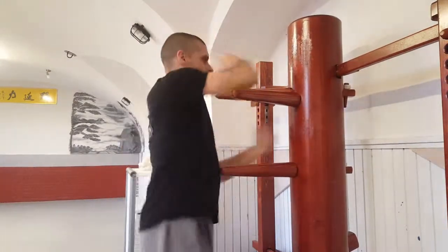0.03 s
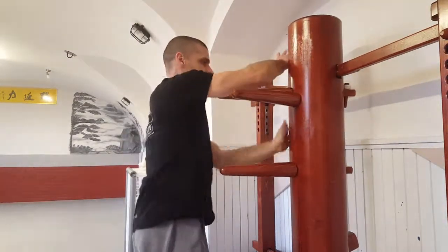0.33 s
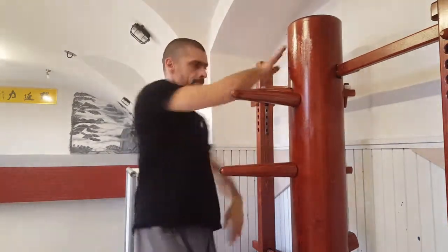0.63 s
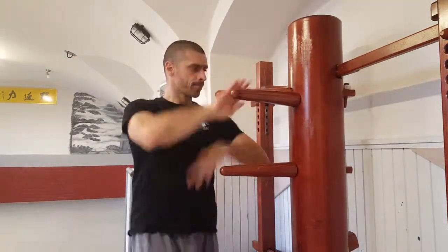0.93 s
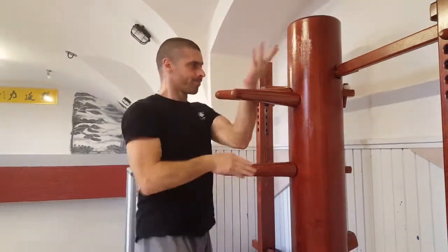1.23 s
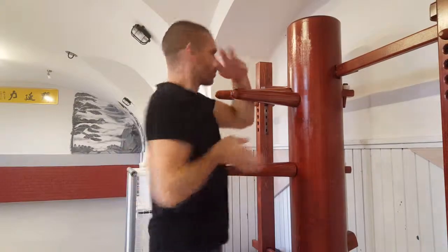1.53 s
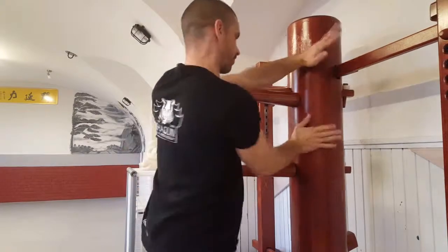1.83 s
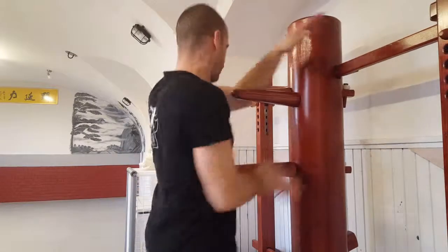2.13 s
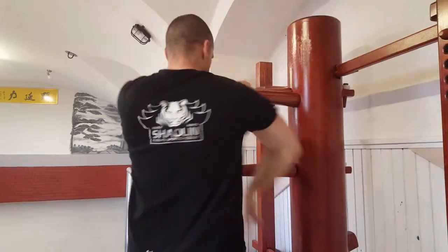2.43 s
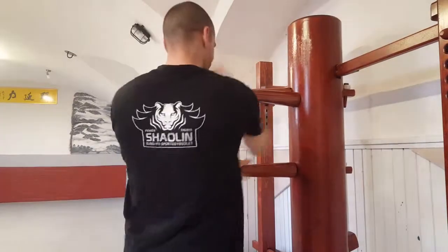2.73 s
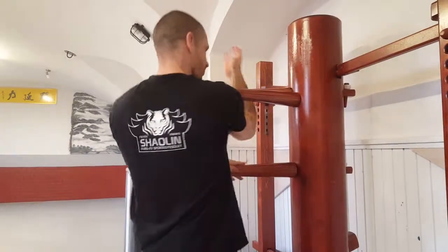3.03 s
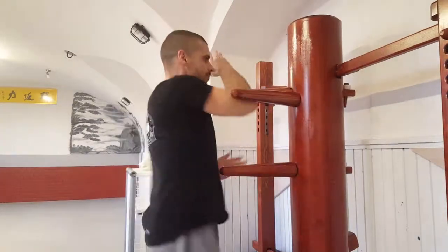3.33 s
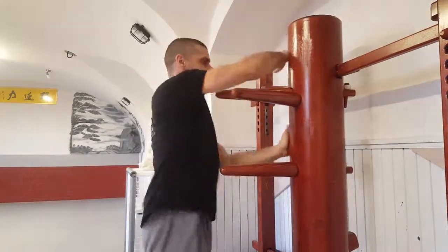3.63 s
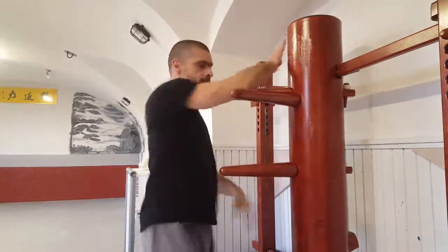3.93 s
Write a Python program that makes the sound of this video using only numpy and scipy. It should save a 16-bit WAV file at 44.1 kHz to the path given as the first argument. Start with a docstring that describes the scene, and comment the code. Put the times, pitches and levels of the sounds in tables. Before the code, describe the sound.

Hands and forearms hit a wooden training dummy in five quick bouts. Palms slap, the trunk thuds and its loose arms clack, slightly to the right. Each blow echoes through a large hall over a low rumble.

```python
"""Hands and forearms strike a wooden training dummy in a large vaulted hall, five bouts in four seconds.
Over a low rumble, palms slap the trunk at 0.2 s and it thuds on its rails. At 0.9 s the loose wooden
arms also knock in their sockets. Another slap and thud land at 1.9 s, a flurry of slaps and knocks at
2.5 s, the last blows at 3.6 s. In most pauses between bouts the frame ticks faintly. The hall answers
every blow with wall echoes and a long tail."""
import sys
import numpy as np
from scipy import signal
from scipy.fft import rfft, irfft
from scipy.io import wavfile

SR = 44100
rng = np.random.default_rng(int(sys.argv[2]) if len(sys.argv) > 2 else 0)


def transcribe(u):
    """Save the signal u as a 16-bit wav file named by the first command-line argument.

    u: samples, shape (n,) or (channels, n), limited to [-1, 1]; the rate is SR.
    q: integer samples, one column per channel.
    """
    v = np.clip(np.atleast_2d(u).T, -1, 1)
    q = np.round(v * 32767).astype(np.int16)
    wavfile.write(sys.argv[1], SR, q)


N = 176400


def from_db(db):
    """Decibels to gain."""
    return 10 ** (np.asarray(db) / 20)


def at_hz(points, hz):
    """Read a table on a log-frequency axis."""
    freqs, values = np.transpose(points)
    return np.interp(np.log(hz), np.log(freqs), values)


def add(out, start_s, x):
    """Mix a sound in at a time."""
    i = int(start_s * SR)
    x = x[..., :out.shape[1] - i]
    out[:, i:i + x.shape[-1]] += x


def decay(t, t60_s):
    """Exponential fall, 60 dB in t60_s."""
    return np.exp(-np.log(1000) * t / t60_s)


def smooth(x, tau_s):
    """One-pole smoothing."""
    pole = np.exp(-1 / (tau_s * SR))
    return signal.lfilter([1 - pole], [1, -pole], x)


# Each row: frequency in Hz, left-right correlation.
CORRELATION = [(100, 1), (250, 0.9), (500, 0.82), (1000, -0.0034), (2000, -0.17), (4000, 0.052)]


def noise(spectrum, size):
    """Coloured stereo noise of rms 1, alike in the bass and unrelated in the treble."""
    hz = np.maximum(np.arange(size // 2 + 1) * SR / size, 1)
    mid, side = rfft(rng.standard_normal((2, size)))
    alike = np.clip(at_hz(CORRELATION, hz), -.999, .999)
    stereo = np.sqrt(1 + alike) * mid + np.sqrt(1 - alike) * side * [[1], [-1]]
    rolloff = np.minimum(hz / spectrum[0][0], 1) ** 2 * np.minimum(spectrum[-1][0] / hz, 1) ** 2
    x = irfft(stereo * from_db(at_hz(spectrum, hz)) * rolloff, size)
    return x / x.std()


def burst(spectrum, rise_s, t60_s, size=SR // 2):
    """Noise that swells quickly and dies."""
    t = np.arange(size) / SR
    return noise(spectrum, size) * (1 - np.exp(-t / rise_s)) * decay(t, t60_s)


PULSE_HALF_S = .002


def pulse(hz, width_cycles):
    """One push of pressure between two shallow dips, peak 1."""
    t = np.arange(-PULSE_HALF_S, PULSE_HALF_S, 1 / SR)
    return np.cos(2 * np.pi * hz * t) / np.cosh(2 * hz * t / width_cycles)


def ring(modes, tilt_db_oct, scatter_db):
    """Struck modes, each with a strength that changes from blow to blow."""
    hz, db, t60_s = np.transpose(modes)[:, :, None]
    t = np.arange(int(t60_s.max() * SR)) / SR
    tilted_db = db + tilt_db_oct * np.log2(hz / hz.mean())
    gain = from_db(tilted_db + scatter_db * rng.standard_normal(hz.shape))
    polarity = (-1) ** np.arange(len(hz))[:, None]
    return (gain * polarity * np.sin(2 * np.pi * hz * t) * decay(t, t60_s)).sum(0)


# Each row: frequency in Hz, relative density in dB.
RUMBLE_SPECTRUM = [(20, -37), (36, 11.5), (50, -9), (78, 7.5), (120, -15), (220, -12), (600, -28.5),
                   (1000, -25), (15000, -46)]


def rumble(rms_db=-47):
    """Steady low noise in the hall."""
    return from_db(rms_db) * noise(RUMBLE_SPECTRUM, N)


# Each row: frequency in Hz, tail level against the direct sound in dB.
TAIL_LEVELS = [(50, -9), (80, -4), (150, -2), (400, -5.5), (1000, -1), (1700, -4), (2500, 3), (3400, -1),
               (5000, -3.5), (9000, -2), (14000, -22)]
# Each row: frequency in Hz, t60 in seconds.
TAIL_DECAYS = [(60, 1.5), (160, 2.46), (420, 0.88), (1100, 1.225), (2900, 1.114), (7700, 0.71),
               (13000, 0.19)]


def hall_tail(x, build_s=0.014):
    """The hall stores energy band by band and returns it as a diffuse tail; treble dies first."""
    edges_hz = np.geomspace(240, 16200, 41) - 200
    whites = [noise([(1, 0), (SR, 0)], N) for _ in range(3)]
    out = np.zeros((2, N))
    for k, (low, high) in enumerate(zip(edges_hz, edges_hz[1:])):
        hz = np.sqrt(low * high)
        band = signal.butter(2, [low, high], "band", fs=SR, output="sos")
        power = signal.sosfilt(band, x + 1e-9 * whites[0][0]) ** 2
        drain_s = at_hz(TAIL_DECAYS, hz) / (2 * np.log(1000))
        stored = smooth(smooth(power, build_s), drain_s)
        field = signal.sosfilt(band, whites[k % len(whites)])
        out += from_db(at_hz(TAIL_LEVELS, hz)) * np.sqrt(stored) * field / field.std()
    return out


# Wall and vault. Each row: delay in seconds, level in dB.
REFLECTIONS = [(0.0112, -18.5), (0.037, -15)]
# Each row of both: frequency in Hz, relative density in dB.
ECHO_SPECTRUM = [(100, -3), (10000, -12.5), (15000, -24)]
VAULT_SPECTRUM = [(120, -14), (200, -11.5), (300, 0), (440, -1.5), (600, -13.5), (1200, -9)]


def echoes(x, boom_db=-20):
    """Near surfaces return dull, smeared copies; standing waves under the vault hold the wood's pitch."""
    boom = burst(VAULT_SPECTRUM, rise_s=0.013, t60_s=0.98, size=2 * SR)
    response = from_db(boom_db) * boom / np.linalg.norm(boom[0])
    for delay_s, db in REFLECTIONS:
        echo = burst(ECHO_SPECTRUM, rise_s=0.0003, t60_s=0.012)
        add(response, delay_s, from_db(db) * echo / np.linalg.norm(echo[0]))
    return signal.fftconvolve(x, response, axes=1)[:, :N]


# Each row: start in seconds, level in dB.
FRAME_TICKS = [(0.5068, -41), (0.622, -43.5), (0.7248, -46), (1.608, -46), (1.7149, -48.5), (1.8186, -49.5),
               (2.1791, -41.5), (2.2995, -41.5), (2.4039, -44), (3.92, -42.5)]
# Each row: frequency in Hz, relative density in dB.
TICK_SPECTRUM = [(500, 4), (2000, 2), (5500, -3), (9000, -10), (15000, -30)]


def frame_ticks():
    """In most pauses between bouts the settling frame ticks faintly."""
    out = np.zeros((2, N))
    for start_s, db in FRAME_TICKS:
        add(out, start_s, from_db(db) * burst(TICK_SPECTRUM, rise_s=0.00022, t60_s=0.053))
    return out


# Each row: start in seconds, level in dB, tilt in dB per octave, pitch ratio.
TRUNK_THUDS = [(0.172, -28.5, -2, 1), (0.191, -24, -1, 1.005), (0.872, -33.5, -3.5, 1),
               (0.896, -26, 2.5, 1.03), (1.173, -37, 3, 1.02), (1.8524, -26, 4.5, 0.99),
               (1.864, -26.5, 2.5, 1.01), (2.522, -25, 6, 1), (2.549, -27, -1, 1), (2.83, -38, -1, 1),
               (3.587, -28, -3, 1.01), (3.608, -27.5, 1.5, 1.015)]
# Each row: frequency in Hz, level in dB, t60 in seconds.
TRUNK_MODES = [(73.65, -7.5, 1.78), (83.5, -6.5, 0.55), (135.6, -0.5, 0.67), (164.2, -10, 0.46),
               (273.9, -0.5, 0.39), (290.8, -6.5, 0.47), (330.7, -11.5, 0.14), (390.4, -9.5, 0.66),
               (418, -10, 0.5), (685, -10.5, 0.35)]
# Each row: frequency in Hz, relative density in dB.
SHUDDER_SPECTRUM = [(65, 3), (140, -2.5), (420, 0.5), (560, -23), (900, -12), (1800, -23)]


def trunk_thuds(swell_s=0.0013, shudder_boost_db=3.5):
    """The trunk booms on its rails, its pitch set by the hand's place and pressure; the frame shudders."""
    out = np.zeros((2, N))
    for start_s, db, tilt_db_oct, pitch in TRUNK_THUDS:
        modes = [(hz * pitch, mode_db, t60_s) for hz, mode_db, t60_s in TRUNK_MODES]
        boom = ring(modes, tilt_db_oct, scatter_db=2.5)
        swell = 1 - np.exp(-np.arange(len(boom)) / SR / swell_s)
        shudder = burst(SHUDDER_SPECTRUM, rise_s=0.0023, t60_s=0.29)
        add(out, start_s, from_db(db) * boom * swell)
        add(out, start_s, from_db(db + shudder_boost_db) * shudder)
    return out


# Each row: start in seconds, ring in dB, clack peak in dB, clack centre in Hz, rattle in dB.
ARM_KNOCKS = [(0.8676, -24.5, -4, 1190, -18.5), (0.8723, -25, -13.5, 1800, -27),
              (0.8828, -25.5, -17, 850, -30), (0.8959, -23.5, -13, 620, -51), (0.915, -29.5, -16, 900, -32),
              (2.52, -34.5, -17, 595, -31), (2.527, -30.5, -11, 907, -20.5),
              (2.5318, -29.5, -15, 1540, -29), (2.5468, -30.5, -13, 1050, -18),
              (2.5506, -25, -13, 450, -25), (2.5835, -29.5, -12.5, 990, -27), (2.6225, -37, -23, 900, -27),
              (3.596, -35, -17, 1310, -23)]
# Each row: frequency in Hz, level in dB, t60 in seconds.
ARM_MODES = [(208.2, 0.5, 0.14), (279.7, -2, 0.36), (435.1, -1.5, 0.32), (462, -15, 0.3), (591, -8, 0.17),
             (710, -4, 0.085), (771, -3, 0.092), (800, -1.5, 0.083), (896, -1.5, 0.094), (983, 2.5, 0.043),
             (1120, -10.5, 0.076), (1477, -9.5, 0.096), (1640, 0, 0.027)]
# Each row: frequency in Hz, relative density in dB.
RATTLE_SPECTRUM = [(500, 8.5), (900, -12), (1550, 7.5), (2100, -3.5), (3000, -9.5)]


def arm_knocks(neutral_hz=790):
    """A loose arm clacks in its socket, rattles and rings; a harder, higher clack rings brighter."""
    out = np.zeros((2, N))
    for start_s, ring_db, clack_db, clack_hz, rattle_db in ARM_KNOCKS:
        tilt_db_oct = 4 * np.log2(clack_hz / neutral_hz)
        add(out, start_s - PULSE_HALF_S, from_db(clack_db) * pulse(clack_hz, width_cycles=0.58))
        add(out, start_s, from_db(rattle_db) * burst(RATTLE_SPECTRUM, rise_s=0.00029, t60_s=0.028))
        add(out, start_s, from_db(ring_db) * ring(ARM_MODES, tilt_db_oct, scatter_db=3.5))
    return out


# Each row: start in seconds, crack peak in dB, smack in dB, centre of crack and ring in Hz,
# smack t60 in seconds, smack tilt in dB per octave, wood ring in dB.
PALM_SLAPS = [(0.1661, -38, -38, 1400, 0.0085, 1, -31), (0.1698, -7, -19.5, 2250, 0.096, 0.5, -23.5),
              (0.1711, -20, -36, 3830, 0.018, 8, -23.5), (0.8478, -31, -30, 2200, 0.28, -3, -51),
              (0.8915, -24, -26.5, 4200, 0.03, 6, -32), (0.8951, -26, -16, 5940, 0.024, 4, -20.5),
              (0.8976, -25, -20, 4200, 0.023, -2, -33.5), (1.1729, -12, -23, 3840, 0.03, 2, -27),
              (1.8508, -39, -22, 1800, 0.11, -0.5, -42), (1.8563, -2.5, -20, 2480, 0.038, 1, -23.5),
              (2.5146, -32, -26, 1800, 0.069, 0.5, -40), (2.5449, -17, -26, 2980, .04, -4, -36),
              (2.829, -16.5, -25, 2280, 0.054, 1, -29), (2.868, -36, -44, 4264, 0.024, 1.5, -26.5),
              (2.923, -45, -30.5, 4800, 0.04, 1, -40), (3.5825, -15, -20.5, 2300, 0.19, 1.15, -34),
              (3.5842, -7.5, -16, 3420, 0.027, -22, -22.5)]
# Each row: frequency in Hz, relative density in dB.
SMACK_SPECTRUM = [(200, -18), (600, -1), (1200, 0), (2000, 3.5), (3200, -3), (5000, -6), (8000, -11.5),
                  (11000, -15.5), (15000, -22)]
# Bright modes of the trunk. Each row: frequency in Hz, level in dB.
WOOD_MODES = [(1350, 7), (1800, 0.5), (2250, -4.5), (2950, -6), (3330, -0.5), (3880, -2), (4250, -12),
              (5900, -3)]


def palm_slaps(wood_t60_s=0.023, width_oct=0.4):
    """Air trapped under the palm cracks, flesh smacks, and wood modes near the crack's pitch ring."""
    out = np.zeros((2, N))
    for start_s, crack_db, smack_db, centre_hz, t60_s, tilt_db_oct, wood_db in PALM_SLAPS:
        spectrum = [(hz, db + tilt_db_oct * np.log2(hz)) for hz, db in SMACK_SPECTRUM]
        modes = []
        for hz, db in WOOD_MODES:
            detuning = np.log2(hz / centre_hz) / width_oct
            modes.append((hz, db - 10 * np.log10(1 + detuning ** 2), wood_t60_s))
        add(out, start_s - PULSE_HALF_S, from_db(crack_db) * pulse(centre_hz, width_cycles=0.36))
        add(out, start_s, from_db(smack_db) * burst(spectrum, rise_s=0.00085, t60_s=t60_s))
        add(out, start_s, from_db(wood_db) * ring(modes, tilt_db_oct=3.5, scatter_db=2.0))
    return out


def scene(left_lag_s=0.00006):
    """The dummy stands a little to the right, so its sound reaches the left channel later."""
    dummy = palm_slaps() + arm_knocks() + trunk_thuds() + frame_ticks()
    t = np.arange(N) / SR
    direct = np.array([np.interp(t - left_lag_s, t, dummy[0]), dummy[1]])
    return direct + echoes(dummy) + hall_tail(dummy[0]) + rumble()


def record(dry):
    """Clip at full scale, then cut the treble above 16.2 kHz."""
    lowpass = signal.cheby2(14, 70, 16200, fs=SR, output="sos")
    return signal.sosfilt(lowpass, np.clip(dry, -1, 1))


dry = scene()
out = record(dry)
transcribe(out)
```